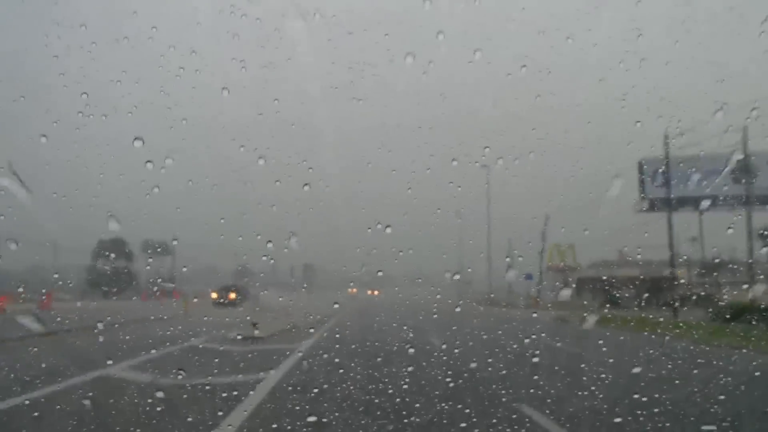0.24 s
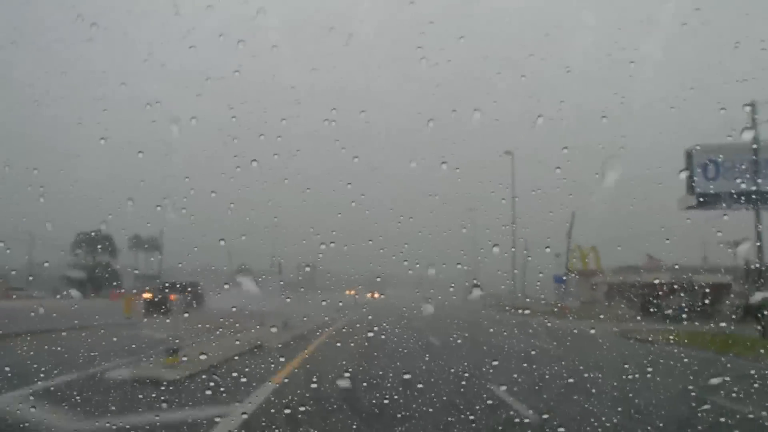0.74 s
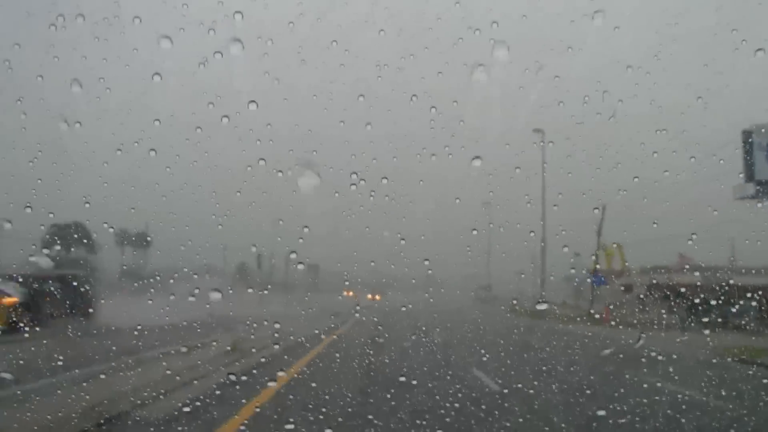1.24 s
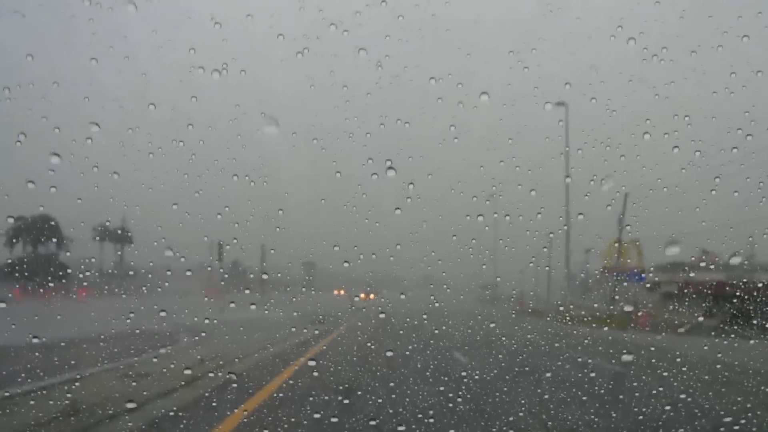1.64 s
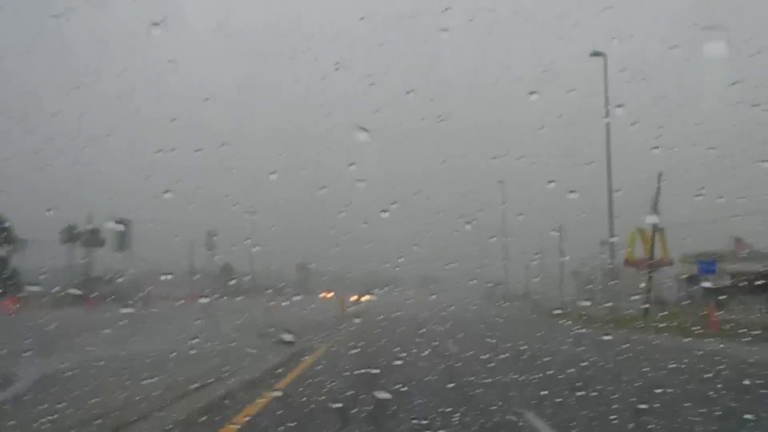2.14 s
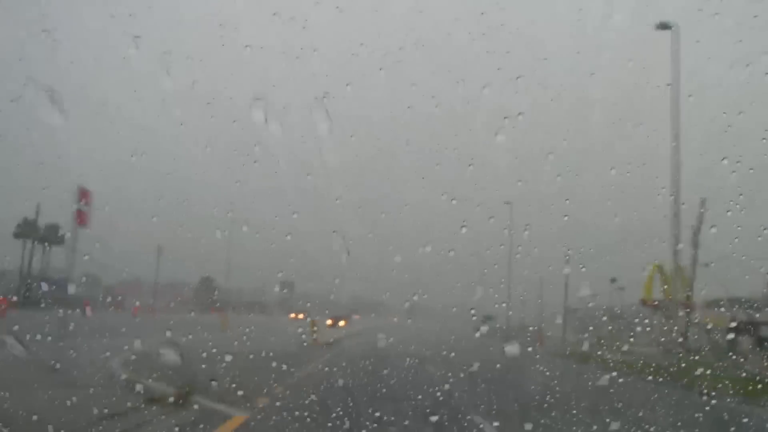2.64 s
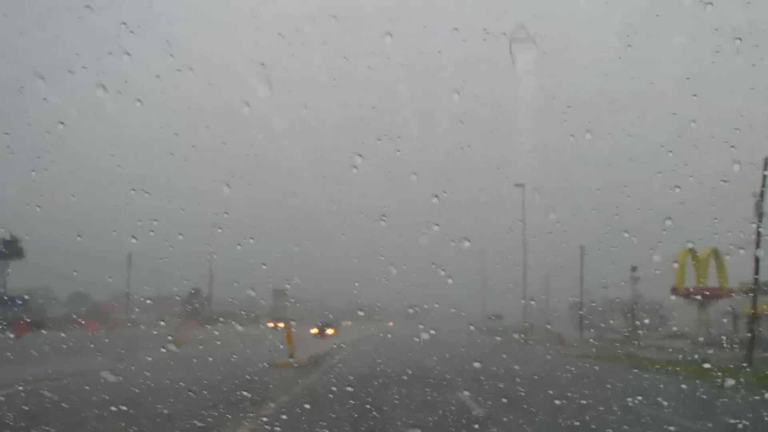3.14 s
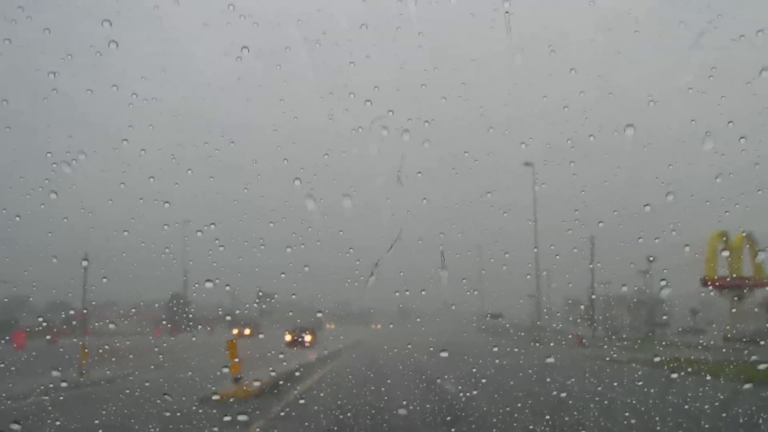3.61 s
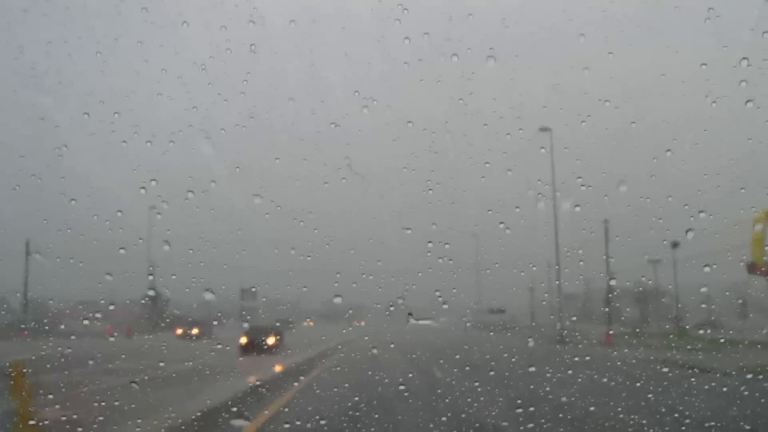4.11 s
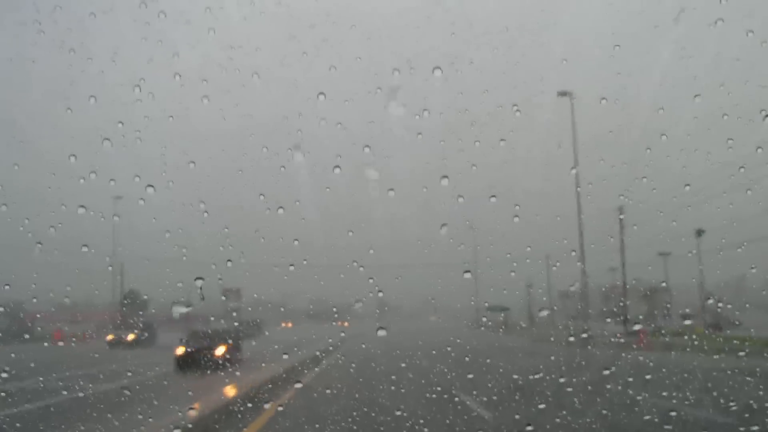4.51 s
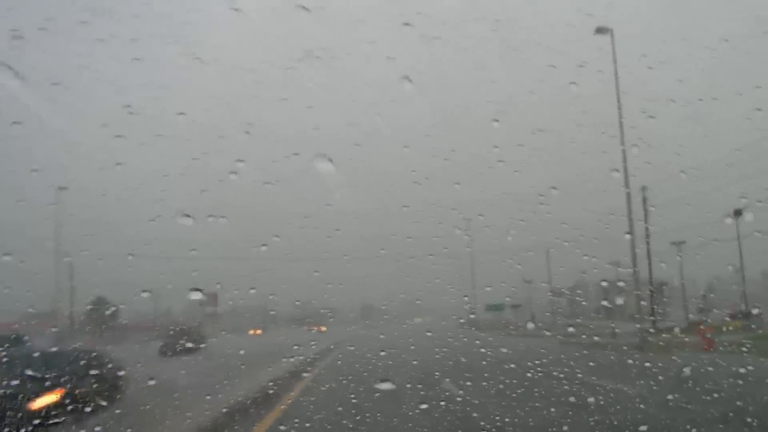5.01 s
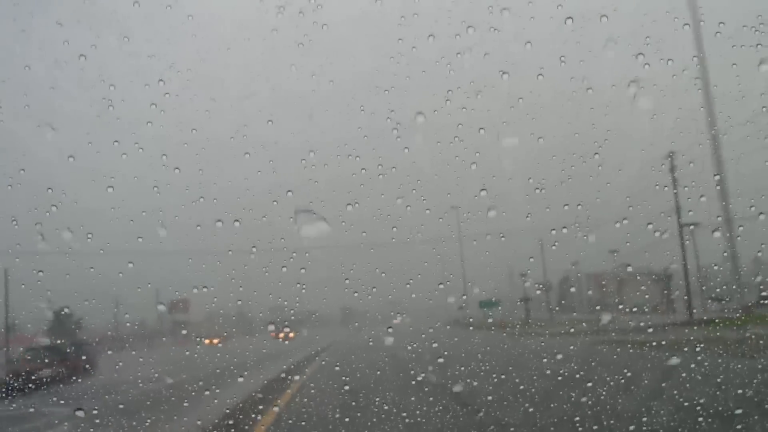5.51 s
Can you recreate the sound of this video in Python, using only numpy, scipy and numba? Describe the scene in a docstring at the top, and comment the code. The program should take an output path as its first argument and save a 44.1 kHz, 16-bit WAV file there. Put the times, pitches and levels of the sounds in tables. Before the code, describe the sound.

Inside a slowly moving car in a downpour: dense bright rain hiss, hard drops smacking the glass, barely audible engine hum beneath.

```python
"""Inside a car driving slowly in heavy rain, heard by a small camera on the dashboard.
Thousands of random drops merge to a hiss; nearer ones are short noise splats that tap and tick on the glass.
Below, filtered noise makes the road rumble and boom, and two wavering sines make the engine hum.
The camera's gain control ducks after the loudest drops and recovers more slowly."""
import sys
import numpy as np
from scipy import signal
from scipy.fft import rfft, irfft
from scipy.io import wavfile
from scipy.ndimage import uniform_filter1d
from numba import njit

SR = 44100
rng = np.random.default_rng(int(sys.argv[2]) if len(sys.argv) > 2 else 0)


def volts_from_decibels(level):
    """Turn decibel levels (scalar or array-like) into linear amplitude factors."""
    exponent = np.asarray(level, float) / 20
    return 10 ** exponent


def wav_out(sig):
    """Save sig, one row per channel (or a flat mono array), as 16-bit PCM at SR to the path in sys.argv[1]."""
    wavfile.write(sys.argv[1], SR, np.round(np.clip(np.atleast_2d(sig).T, -1, 1) * 32767).astype(np.int16))


N = 254016


def level(x, db):
    """RMS normalization: scale to a level [dB], fixed or one value a sample."""
    return x * volts_from_decibels(db) / np.sqrt(np.mean(x ** 2))


def curve(table):
    """Linear interpolation: the columns of a time table, one value a sample."""
    time_s, *columns = np.transpose(table)
    return [np.interp(np.arange(N) / SR, time_s, column) for column in columns]


def response(points, size=4096):
    """Minimum phase: a folded cepstrum turns a colour into a causal impulse response."""
    hz, db = np.transpose(points)
    bins_hz = np.maximum(np.arange(size // 2 + 1) * SR / size, 1)
    spectrum_db = np.interp(np.log(bins_hz), np.log(hz), db)
    cepstrum = irfft(np.log(volts_from_decibels(spectrum_db)))
    cepstrum[1:size // 2] *= 2
    cepstrum[size // 2 + 1:] = 0
    return irfft(np.exp(rfft(cepstrum)))[:size // 2]


def colour(x, h):
    """Linear filtering: convolve x with impulse response h."""
    return signal.fftconvolve(x, h)[:len(x)]


def noise():
    """White noise: equal mean power at every frequency."""
    return rng.standard_normal(N)


def walk(rate):
    """Band-limited modulation: random values, rate a second, smoothed twice; rms about 0.43."""
    k = int(SR / rate)
    steps = np.repeat(rng.standard_normal(N // k + 1), k)
    return 0.58 * uniform_filter1d(uniform_filter1d(steps, k), k)[:N]


def patter(rate, spread_db, spread_s):
    """Shot noise: random drops, many small and few large, each a noisy splat that swells and fades."""
    hit = rng.random(N) < rate / SR
    size_db = np.minimum(spread_db * rng.exponential(size=N), 2.13 * spread_db)
    fade = np.exp(-1 / (spread_s * SR))
    swell = signal.lfilter([1], np.convolve([1, -fade], [1, -fade]), hit * volts_from_decibels(size_db))
    return swell * noise()


# glass, cabin and microphone together: (frequency [Hz], relative level [dB per Hz])
GLASS_COLOUR = [(300, -40), (470, -22), (540, -16), (750, -11.5), (1350, -11.5), (1900, -9.5), (2600, -2.5),
                (3480, 0.5), (4050, -7.5), (5000, -11.5), (8500, -24.5), (11500, -30), (14600, -24),
                (16000, -29.5)]


def glass_response():
    """Linear response: glass, cabin and microphone act as one filter."""
    return response(GLASS_COLOUR)


def tap_response():
    """Stiffness control: a drop on stiff glass pushes little bass."""
    return signal.lfilter(*signal.butter(2, 1100, "high", fs=SR), glass_response())


# splash tick: (frequency [Hz], relative level [dB per Hz])
TICK_COLOUR = [(2000, -67), (4000, -3), (6000, 0.5), (8500, -12), (11500, -14.5), (14500, -10.5),
               (15200, -12), (16000, -32)]


def tick_response():
    """Spectral shaping: a splash tick lies mostly in the treble."""
    return response(TICK_COLOUR)


def far_drops():
    """Superposition: countless far drops blur to a hiss, and the padded roof fills the lows smoothly."""
    hiss = level(noise() * volts_from_decibels(1.8 * walk(40)), -1.65)
    roof = level(signal.lfilter(*signal.butter(2, 1100, fs=SR), noise()), -17.5)
    return colour(hiss + roof, glass_response())


def near_taps():
    """Impact excitation: near drops set the glass ringing, with hard, dry hits among the splats."""
    splats = level(patter(1000, 3.3, 0.00072), -2.5)
    hard_hits = level(patter(120, 4.4, 0.0002), -12)
    return colour(splats + hard_hits, tap_response())


# finest droplets: (frequency [Hz], relative level [dB per Hz])
SPRAY_COLOUR = [(6000, -40), (9000, -17), (12000, -3), (14500, 0), (15300, -2), (16000, -7)]


def splash_ticks():
    """Shot noise: splashes tick at random, and sparser fine droplets crackle on top."""
    ticks = level(colour(patter(350, 4.7, 0.00054), tick_response()), -16.5)
    crackle = level(colour(patter(70, 7.0, 0.00033), response(SPRAY_COLOUR)), -26.5)
    return ticks + crackle


# cabin resonances: (frequency [Hz], width [Hz], level [dB] before the rain's strength)
CABIN_MODES = [(545.5, 7.6, -31), (1346, 63, -22)]


def cabin_drone():
    """Resonance: narrow cabin modes pick their own pitch out of noise."""
    drone = np.zeros(N)
    for hz, width_hz, db in CABIN_MODES:
        drone += level(signal.lfilter(*signal.iirpeak(hz, hz / width_hz, SR), noise()), db)
    return drone


# rain strength: (time [s], level [dB] before gusts, splash ticks over their usual share [dB])
RAIN_STRENGTH = [(0, -13, 1.5), (.5, -14.5, 0), (.66, -17, 1), (.85, -15.5, 3), (1.15, -17, 2),
                 (1.3, -14, 3.5), (1.5, -16, 3), (2.04, -16, 2.5), (2.14, -19, 0), (2.3, -15, 4),
                 (2.44, -15.5, -1), (2.57, -16, 3), (2.7, -16, -1), (3.0, -13.5, 2.5), (3.28, -15.5, 2.5),
                 (3.65, -15.5, 1.5), (4.1, -15.5, 2.5), (4.42, -16, -2), (4.65, -15, 5.5), (5.07, -15.5, 3),
                 (5.2, -18, 1), (5.3, -15.5, -0.5), (5.45, -17, 0), (5.76, -17.5, 3)]


def steady_rain():
    """Amplitude modulation: all the small drops and the drone swell together in small random sheets."""
    level_db, splash_db = curve(RAIN_STRENGTH)
    drops = level(far_drops() + near_taps(), 0.89)
    gust_db = 1 * walk(12)
    return (drops + splash_ticks() * volts_from_decibels(splash_db) + cabin_drone()) * volts_from_decibels(level_db + gust_db)


# biggest drops on the glass, before gain control: (time [s], tap peak [dB], tick peak [dB])
BIGGEST_DROPS = [(0.0892, 2.5, -22), (0.4534, -1.5, -22), (0.5179, 6, -26), (0.677, -11, -18),
                 (0.725, -8, -11), (0.7748, -1, -23), (0.7986, -1, -23), (0.9061, 2.5, -20),
                 (0.999, 2, -22), (1.3031, -9, -14), (1.3772, -3, -24), (1.3982, 3, -18), (1.4852, 0, -19),
                 (1.674, -8, -25), (1.743, 0, -21), (1.8386, -6, -15), (1.9524, -3, -22),
                 (2.0725, 0.5, -27), (2.3351, -7, -18), (2.4074, 4, -23), (2.6322, 0.5, -22),
                 (2.657, -1, -25), (2.7949, -3, -24), (2.8707, -4, -22), (2.9859, 0.5, -21),
                 (3.0468, 4, -23), (3.3272, -4.5, -22), (3.401, 0, -27), (3.6046, -4, -14), (3.729, 0, -25),
                 (3.805, -8, -18), (4.1432, -6, -24), (4.2415, -4, -20), (4.6477, -7, -17),
                 (5.0842, 2.5, -18), (5.4089, 2, -25), (5.6097, 0.5, -26)]


def big_drops(column, h, spread_s, count=220):
    """Impulse excitation: each listed drop is a random splat of count samples ringing h."""
    out = np.zeros(N + 2 * count)
    age = np.arange(count) / (spread_s * SR)
    for drop in BIGGEST_DROPS:
        splat = rng.standard_normal(count) * age * np.exp(-age)
        ring = np.convolve(splat, h[:count])
        start = int(drop[0] * SR)
        out[start:start + len(ring)] += volts_from_decibels(drop[column]) * ring / np.abs(ring).max()
    return out[:N]


def rain():
    """Superposition: the steady rain plus the taps and ticks of the biggest drops."""
    big_taps = big_drops(1, tap_response(), 0.00053)
    big_ticks = big_drops(2, tick_response(), 0.00091)
    return steady_rain() + big_taps + big_ticks


# road through the body: (time [s], rumble level [dB], boom level [dB] before random heaving)
ROAD_LEVELS = [(0, -38, -50), (.5, -38.5, -55), (1.36, -39.5, -51), (1.96, -40, -55), (2.55, -40, -47),
               (3.1, -39.5, -51), (3.65, -37, -44), (4.1, -37.5, -43), (4.5, -42, -53), (4.8, -39.5, -51),
               (5.76, -42.5, -54)]
# colour of the tyre rumble: (frequency [Hz], relative level [dB per Hz])
RUMBLE_COLOUR = [(56, -34), (95, -13), (108, -8.5), (129, -1), (231, -1), (335, -3.5), (400, -2.5),
                 (455, -9), (480, -29), (620, -28), (1060, -120)]
# colour of the deep body boom: (frequency [Hz], relative level [dB per Hz])
BOOM_COLOUR = [(13, -22), (22, -5), (43, 5), (81, -1.5), (100, -9), (130, -35), (220, -120)]


def road():
    """Structure-borne sound: the body filters road noise to a rumble and a boom that heaves at random."""
    rumble_db, boom_db = curve(ROAD_LEVELS)
    boom_db = boom_db + 3 * walk(8)
    rumble = level(colour(noise(), response(RUMBLE_COLOUR, size=16384)), rumble_db)
    boom = level(colour(noise(), response(BOOM_COLOUR, size=16384)), boom_db)
    return rumble + boom


# engine hum: (time [s], rms level of the lower order [dB])
HUM_LEVEL = [(0.0, -48), (1.75, -48), (2.05, -66), (2.4, -62), (2.57, -46), (3.0, -55), (3.5, -47),
             (4.2, -48.5), (5.5, -59.5), (5.76, -50)]


def engine():
    """Periodic excitation: two engine orders keep a fixed ratio while their pitch wavers."""
    hum_db, = curve(HUM_LEVEL)
    lower_hz, upper_hz = 117, 151.3  # mean pitches
    phase = 2 * np.pi * np.cumsum(lower_hz + 1.39 * walk(4.6)) / SR
    orders = np.sin(phase) + volts_from_decibels(-4.5) * np.sin(phase * upper_hz / lower_hz)
    return np.sqrt(2) * orders * volts_from_decibels(hum_db)


def scene():
    """Superposition: rain over the car's own road noise and engine hum."""
    return (rain() + road() + engine())[None]


@njit
def gain_control(x, top, attack, release, depth, ahead):
    """Compression: a peak follower, fast up and slow down, smoothly turns down what exceeds top."""
    y, envelope, gain = np.empty(len(x)), 0., 1.
    for i in range(len(x)):
        peak = abs(x[min(i + ahead, len(x) - 1)])
        envelope += (peak - envelope) * (1. if peak > envelope else release)
        target = min(1., (top / (envelope + 1e-9)) ** depth)
        gain += (target - gain) * attack
        y[i] = x[i] * gain
    return y


def band_limit(x):
    """A steep low-pass at the top of the band."""
    return signal.sosfilt(signal.butter(12, 16290, fs=SR, output="sos"), x)


def record(dry):
    """Dynamic range limiting: gain control ducks loud drops, then peaks are rounded and the top is cut."""
    attack_s, release_s, ahead_s = .0003, .08, .0002
    ducked = gain_control(dry[0], volts_from_decibels(-3.5), 1 / (attack_s * SR), 1 / (release_s * SR), 0.78,
                          int(ahead_s * SR))
    rounded = ducked / (1 + np.abs(ducked) ** 6) ** (1 / 6)
    top_cut = signal.ellip(9, 2, 60, 15620, fs=SR, output="sos")  # ripple, stop [dB], edge [Hz]
    mix = signal.sosfilt(top_cut, rounded)[None]
    return band_limit(mix)


dry = scene()
out = record(dry)
wav_out(out)
```